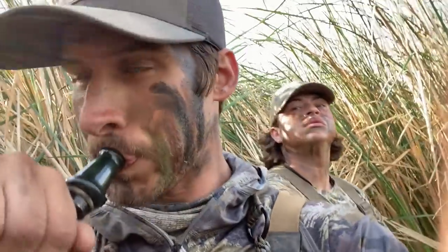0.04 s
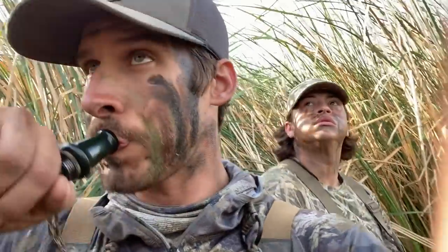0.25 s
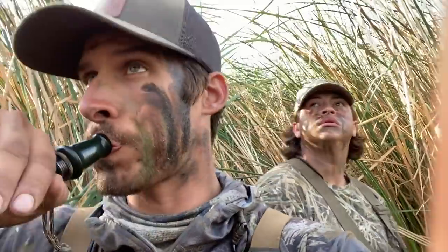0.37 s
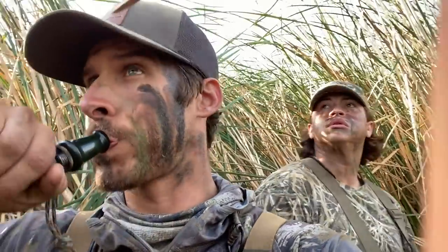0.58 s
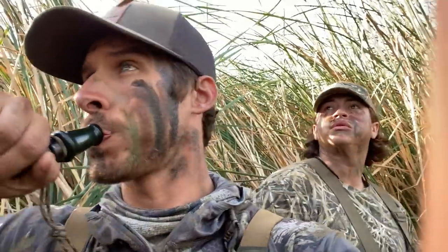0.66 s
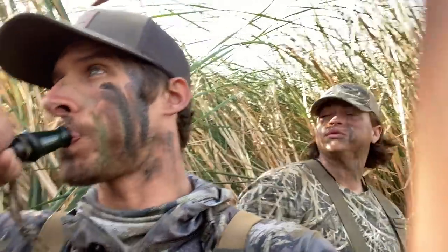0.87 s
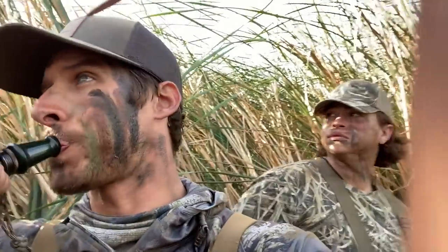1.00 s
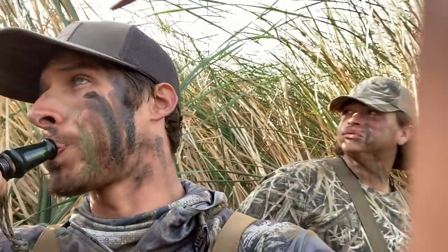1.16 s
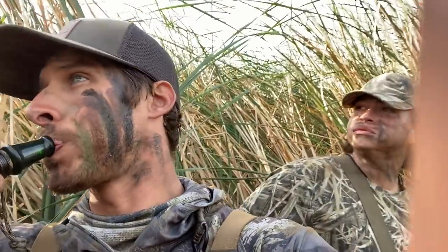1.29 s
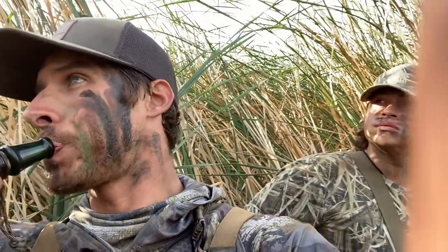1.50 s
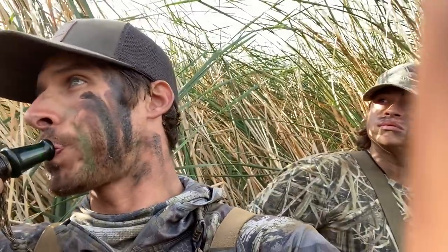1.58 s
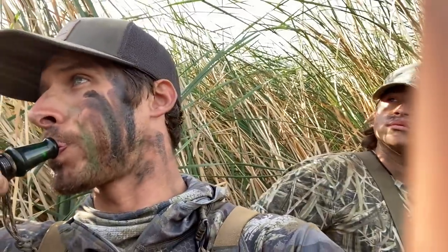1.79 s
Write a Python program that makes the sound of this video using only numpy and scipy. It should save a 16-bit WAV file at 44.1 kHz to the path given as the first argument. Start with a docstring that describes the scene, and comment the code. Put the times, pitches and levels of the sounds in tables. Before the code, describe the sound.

A handheld duck call blown close up gives three short, reedy quacks, each fainter than the last.

```python
"""A handheld duck call is blown three times, close to the microphone, each quack fainter than the last.
Its reed slaps about 360 times a second, splits into long and short cycles and rings the barrel and cupped
hand; each slap lets out a puff of hissing air, and a thin squeal falls away as the air stops.
The open marsh returns a faint echo over a low distant rumble, with soft handling knocks and, at the start,
a brief rustle of clothing."""
import sys
import numpy as np
from scipy import signal
from scipy.fft import rfft, irfft
from scipy.io import wavfile
from scipy.ndimage import uniform_filter1d, minimum_filter1d

SR = 44100
rng = np.random.default_rng(int(sys.argv[2]) if len(sys.argv) > 2 else 0)


def to_wav(sig):
    """Store sig (one row per channel, or 1-D mono) as 16-bit WAV at the path in sys.argv[1].

    Samples outside -1..1 are clipped; the rate is SR.
    """
    pcm = np.clip(np.atleast_2d(sig), -1, 1) * 32767
    pcm = np.round(pcm).astype(np.int16)
    wavfile.write(sys.argv[1], SR, pcm.T)  # frames by channels


N = 81585

# spectrum of air hissing past the reed: freq_hz, relative level_db
AIR_SPECTRUM = [(300, -28.5), (1500, -10), (2400, -4.5), (3200, -2), (3900, -8), (4800, -11.5), (5800, -2),
                (6800, -10), (7800, -9), (9700, -10.5), (10700, -19.5), (11800, -19.5), (13200, -27.5),
                (16000, -31)]
LOUD_DB = -18  # quack level under which the 2 kHz ring softens; also the reference for its air


def undb(db):
    """Decibels to gain."""
    return 10 ** (np.asarray(db) / 20)


def curve(table, at, axis=1):
    """One column of a table, joined by straight lines."""
    rows = np.array(table, float)
    return np.interp(at, rows[:, 0], rows[:, axis])


def colour(points, hz):
    """Decibels of a spectrum on a log-frequency axis."""
    rows = np.array(points, float)
    return np.interp(np.log(np.maximum(hz, 1)), np.log(rows[:, 0]), rows[:, 1])


def noise(points):
    """Noise of rms 1 with the given spectrum."""
    gains = undb(colour(points, np.fft.rfftfreq(N, 1 / SR)))
    x = irfft(rfft(rng.standard_normal(N)) * gains, N)
    return x / x.std()


def ringing(db):
    """Causal (minimum-phase) frequency response with the given gains, by folding the cepstrum."""
    cepstrum = irfft(np.log(undb(db)))
    half = len(cepstrum) // 2
    cepstrum[1:half] *= 2
    cepstrum[half + 1:] = 0
    return np.exp(rfft(cepstrum))


def add(out, start, x):
    """Mix a short sound in at a sample position."""
    out[start:start + len(x)] += x[:len(out) - start]


def background(t):
    """Low distant rumble, nearly alike on both sides, and a brief rustle of clothing, separate on each."""
    # spectrum of the distant rumble: freq_hz, relative level_db
    rumble_spectrum = [(15, -39), (25, -23), (70, 4), (168, -6), (278, -26.5), (309, -34), (584, -43),
                       (761, -29.5), (1440, -33.5), (2140, -28.5), (3100, -40), (4030, -40.5), (14000, -54)]
    # swell of the rumble: time_s, level_db before the lift below
    rumble_swell = [(0.0, -64), (0.17, -57.5), (0.304, -71.5), (0.546, -71.5), (0.752, -65.5), (0.85, -66),
                    (1.05, -71), (1.22, -75), (1.38, -72.5), (1.85, -73.5)]
    # spectrum of the clothing: freq_hz, relative level_db
    rustle_spectrum = [(200, 2.5), (600, -10), (1500, -34), (4000, -24.5), (8500, -20.5), (14000, -32)]
    rumble_lift_db, rustle_db, rustle_end_s, rustle_fade_s = 3.5, -67.5, .22, .017

    common = noise(rumble_spectrum)
    side = .25 * noise(rumble_spectrum) * np.array([[1], [-1]])  # opposite sign left and right
    rumble = (common + side) * undb(curve(rumble_swell, t) + rumble_lift_db)
    rustle = np.array([noise(rustle_spectrum), noise(rustle_spectrum)])
    rustle = rustle * np.clip((rustle_end_s - t) / rustle_fade_s, 0, 1)
    return rumble + undb(rustle_db) * rustle


def marsh(t, x):
    """Faint scatter from the reed beds as decaying noise, with a later swell from far off."""
    # spectrum the marsh sends back: freq_hz, relative level_db
    marsh_spectrum = [(200, -6.5), (800, -5), (1600, -8.5), (2300, -2.5), (3000, -2), (6000, -17),
                      (14000, -23.5)]
    echo_db, echo_t60_s = -54.52, .8
    far_db, far_delay_s, far_spread_s = -16.52, .27, .04  # far_db is relative to the start of the near scatter
    linger_db, linger_t60_s = -71.5, .9
    linger_spectrum = [(600, -19), (1600, -14), (2100, -2.5), (2450, -9), (3000, -22.5), (9000, -37)]

    near_scatter = undb(-60 * t / echo_t60_s)
    far_swell = undb(far_db) * np.exp(-((t - far_delay_s) / far_spread_s) ** 2)
    shape = near_scatter + far_swell
    shape = shape / np.sqrt(np.sum(shape ** 2))
    echo = signal.fftconvolve(x, undb(echo_db) * noise(marsh_spectrum) * shape)[:N]
    # a dying wash of noise from the first instant, as the echo of an earlier quack
    linger = undb(linger_db - 60 * t / linger_t60_s) * noise(linger_spectrum)
    return echo + linger


def ticks(t):
    """Soft knocks from handling the call: short bursts of noise round one pitch."""
    # handling knocks: start_s, centre_hz, level_db before the envelope, decay_s
    knocks = [(0.056, 7040, -54, 0.0027), (0.134, 440.5, -47.5, 0.0032), (.184, 438, -55, 0.0046),
              (0.631, 479.5, -61.5, 0.0037), (0.769, 424.2, -63, 0.0042), (1.410, 476, -60, 0.0035),
              (1.409, 1450, -67, .003)]
    out = np.zeros(N)
    for start, hz, db, decay in knocks:
        age = np.maximum(t - start, 0)
        envelope = np.minimum(age / 0.003, 1) * np.exp(-age / decay)
        out += undb(db) * envelope * noise([(hz / 4, -25), (hz, 0), (hz * 2, -9), (hz * 8, -45)])
    return out


def slap(hz, age, hand, level_db):
    """Colour in dB of one reed slap; the hand opens and the treble blooms as the quack goes on."""
    # one reed slap through the barrel: freq_hz, relative level_db
    barrel_spectrum = [(100, -50), (230, -12.5), (360, -23.5), (470, -13.5), (600, -30.5), (740, -13.5),
                       (1000, -13.5), (1270, -9.5), (1650, -10), (2150, -2.5), (2420, -4.5), (2700, -17.5),
                       (3100, -38.5), (3900, -29.5), (4900, -36.5), (5750, -22), (6700, -41), (7700, -30.5),
                       (8400, -46.5), (9700, -30.5), (10700, -45), (11800, -43.5), (13200, -61.5),
                       (16000, -66)]
    opening_s, hand_width_hz = 0.052, 59
    hollow_hz, hollow_width_hz = 673, 68
    bore_spacing_hz, bore_db = 643.7, -0.5  # ripple of the bore's upper resonances
    bloom_s, bloom_db, bloom_from_hz = .022, -13, 2700
    softening = 0.39  # dB lost around 2.2 kHz per dB below LOUD_DB

    shut_hz, open_hz, hand_db, treble_db, hollow_db = hand
    hand_hz = np.interp(age, [0, opening_s], [shut_hz, open_hz])
    db = colour(barrel_spectrum, hz)
    db = db + hand_db / (1 + ((hz - hand_hz) / hand_width_hz) ** 2)
    db = db + hollow_db * np.exp(-((hz - hollow_hz) / hollow_width_hz) ** 2)
    bore_ripple_db = bore_db * np.cos(2 * np.pi * hz / bore_spacing_hz)
    db = db + (treble_db + bore_ripple_db) * np.clip(hz / 1000 - 2.5, 0, 1)
    db = db + bloom_db * max(1 - age / bloom_s, 0) * np.clip((hz - bloom_from_hz) / 500, 0, 1)
    return db + softening * min(level_db - LOUD_DB, 0) * np.exp(-((hz - 2200) / 500) ** 2)


def quack(controls, beating, hand):
    """Each reed cycle gives a low push, an uneven slap that rings barrel and hand, and a puff of air."""
    frame = 1024  # samples in one slap
    quack_lift_db, fundamental_lift_db = 4, 4
    ring_s, choke_s = .0016, .0006  # free ring, then decay
    attack_s, attack_db = .008, -6.5  # the first slaps are weak
    # unevenness at full alternation (swing) and full roughness (jitter, scatter)
    swing_s, swing_db, swing_rad = .00009, 1.1, 0.62
    jitter_s, scatter_db = .00021, 1.5
    push_swing, push_scatter = 0.062, 0.22  # as fractions of the push
    air_db, air_decay_s, air_growth = -24, 0.0049, 0.87  # growth in dB per dB of slap level
    air_bloom_s, air_bloom_db = .022, -13  # the puffs begin weak
    # faint hiss swelling up to the start of the quack and dying away after it; level relative to air_db
    onset_hiss_db, onset_hiss_s = -36.5, .016

    begin = controls[0][0]
    t = np.arange(begin, controls[-1][0], 1 / SR)
    phase = np.cumsum(curve(controls, t)) / SR
    slaps = np.interp(np.arange(.3, phase[-1]), phase, t)  # one slap a cycle
    hz, age = np.fft.rfftfreq(frame, 1 / SR), np.arange(frame) / SR
    main = (hz > 900) & (hz < 3000)  # band whose rms sets the ring level
    low = np.clip((600 - hz) / 160, 0, 1)
    mid = np.interp(hz, [1000, 1500, 2500, 2900], [0, 1, 1, 0])
    choke = np.exp(-np.maximum(age - ring_s, 0) / choke_s)  # the reopening reed chokes the ring
    out, puffs = np.zeros(N), np.zeros(N)
    chances = rng.standard_normal((len(slaps), 2))
    for k, (at, chance) in enumerate(zip(slaps, chances)):
        pitch = curve(controls, at)
        level_db, base_db = curve(controls, at, axis=2), curve(controls, at, axis=3)
        split = curve(beating, at) * (-1) ** k  # long and short cycles take turns
        rough = curve(beating, at, axis=2)
        since = at - begin

        body = ringing(slap(hz, since, hand, level_db))
        ring = mid * rfft(irfft(body) * choke) + (1 - mid) * body
        ring = ring / np.sqrt(2 * np.sum(abs(ring[main]) ** 2) / frame * pitch / SR)
        ring_db = level_db + attack_db * max(1 - since / attack_s, 0) + quack_lift_db
        ring = ring * undb(ring_db + swing_db * split + scatter_db * rough * chance[1])
        shift_s = swing_s * split + jitter_s * rough * chance[0]
        # alternate slaps also differ in shape: a constant phase turn
        ring = ring * np.exp(-2j * np.pi * hz * shift_s - 1j * swing_rad * split)

        push = body / np.interp(pitch, hz, abs(body)) * SR / pitch / np.sqrt(2)
        push = push * undb(base_db + fundamental_lift_db)
        push = push * (1 + push_swing * split + push_scatter * rough * chance[0])

        start = int(at * SR) - frame // 4  # room for slaps that come early
        delay = np.exp(-2j * np.pi * hz * (at - start / SR))
        add(out, start, irfft((low * push + (1 - low) * ring) * delay))
        puff_db = LOUD_DB + air_growth * (level_db - LOUD_DB)
        puff_db = puff_db + air_bloom_db * max(1 - since / air_bloom_s, 0)
        add(puffs, int(at * SR), undb(puff_db) * np.exp(-age / air_decay_s))
    onset_hiss = undb(onset_hiss_db) * np.exp(-abs(np.arange(N) / SR - begin) / onset_hiss_s)
    return out + undb(air_db) * (puffs + onset_hiss) * noise(AIR_SPECTRUM)


def squeal(t, start, length, start_hz, end_hz, db):
    """As the air stops, the reed flutters in a higher, falling tone."""
    # harmonics of the squeal from the fundamental up: relative level_db
    partials_db = [-9, -4.5, 2, 2.5]
    fade_db, air_db = -9.5, -16.5
    dulling_db = -9.5  # each higher partial fades this much more

    u = np.clip((t - start) / length, 0, 1)
    flutter = 1 + .05 * noise([(200, 5), (600, -53), (2000, -88.5)])
    pitch = (start_hz + (end_hz - start_hz) * u) * flutter
    phase = 2 * np.pi * np.cumsum(pitch) / SR
    tone = np.zeros(N)
    for k, partial_db in enumerate(partials_db):
        tone += undb(partial_db + dulling_db * k * u) * np.sin((k + 1) * phase)
    envelope = undb(db + fade_db * u) * np.minimum(u * 10, 1) * np.minimum((1 - u) * 2, 1)
    return envelope * (tone + undb(air_db) * noise(AIR_SPECTRUM))


def ports(x):
    """The near sound mostly reaches the left microphone port first; the housing colours each side."""
    # lead of the left port: freq_hz, phase_rad
    port_lead = [(0, -1), (520, 1.18), (780, 0.6), (2760, 2.5), (3190, 3), (4220, 6.5), (5000, 8.5),
                 (5600, 8), (6720, 7.5), (8180, 5.5), (9990, 10), (11200, 9.5), (12400, 17.5), (14400, 13)]
    # left minus right: freq_hz, difference_db
    port_balance = [(60, -3.5), (110, 0.5), (200, 4.5), (370, 1), (680, 9), (1250, 2.5), (2300, 0),
                    (4220, -5), (7750, 3), (14200, -2.5)]
    hz = np.fft.rfftfreq(N, 1 / SR)
    tilt = undb(colour(port_balance, hz) / 2)
    right = np.exp(-1j * curve(port_lead, hz)) / tilt
    return irfft(rfft(x) * np.array([tilt, right]), N)


def scene():
    """Three quacks close to the microphone, the marsh around them."""
    # the reed, one table per quack: time_s, pitch_hz, slap level_db and fundamental level_db before the lifts
    reed_controls = [
        [(0.226, 235.8, -32, -46), (0.232, 281.2, -28.5, -38.5), (0.24, 340.4, -26, -41),
         (0.244, 371.4, -9.5, -34.5), (0.254, 354.9, -8, -28.5), (0.292, 368.3, -15.5, -42),
         (0.358, 370.2, -20, -47.5), (0.37, 394.5, -29.5, -45), (0.386, 412.7, -52.5, -64)],
        [(0.829, 255.2, -40.5, -46), (0.839, 266, -37.5, -48), (0.847, 336.7, -31, -45),
         (0.853, 353.4, -22.5, -40), (0.877, 347.8, -16, -37), (0.911, 357.2, -21.5, -41.5),
         (0.979, 384, -24.5, -43.5), (1.002, 452, -48.5, -51)],
        [(1.453, 252, -46.5, -51.5), (1.459, 271, -50.5, -53), (1.471, 341, -33, -49.5),
         (1.489, 356.5, -26, -42), (1.521, 361.4, -20, -40.5), (1.589, 374.9, -28.5, -47.5),
         (1.611, 419, -34.5, -44.5), (1.619, 445, -48.5, -59.5)],
    ]
    # how the reed beats, one table per quack: time_s, long-short alternation 0-1, roughness 0-1
    reed_beating = [
        [(.23, 0.2, 0), (.25, 0.51, 0.2), (.275, 0.54, 0.4), (.3, 0.7, 0.9), (.345, .45, 0.5), (.375, 0.4, 0.3)],
        [(.83, 0.05, .15), (.85, 0, .2), (.868, 0.9, 0.2), (.895, 1, 0.7), (.91, 1, 0.2), (.975, 0.88, .13),
         (1.0, 0, 0.3)],
        [(1.455, 0.17, 0.15), (1.497, .1, .12), (1.515, 0.6, .7), (1.545, 0.73, 0.8), (1.562, 1, 0.2),
         (1.595, 0.78, .18), (1.615, 0, 0.41)],
    ]
    # cupped hand, one row per quack: resonance shut_hz, open_hz, resonance_db, treble_db, hollow_db
    cupped_hand = [(1830, 2197, 26, -4, -3), (1878, 2140, 18.5, 1.5, -10.5), (2040, 2080, 19, 2, -19.5)]
    # closing squeals: start_s, length_s, start_hz, end_hz, level_db before the fade and partial levels
    closing_squeals = [(0.374, 0.031, 635, 500, -45), (0.996, 0.037, 654.7, 454, -38.5),
                       (1.616, 0.034, 656, 460, -40)]
    # how strongly each quack carries into the reeds: relative level_db
    carry_db = [-3, 0, 3.5]

    t = np.arange(N) / SR
    quacks = [quack(*parts) for parts in zip(reed_controls, reed_beating, cupped_hand)]
    squeals = sum(squeal(t, *row) for row in closing_squeals)
    near = sum(quacks) + squeals + ticks(t)
    far = sum(undb(db) * x for db, x in zip(carry_db, quacks))
    echoes = np.array([marsh(t, far), marsh(t, far)])  # separate scatter left and right
    return ports(near) + echoes + background(t)


def record(dry):
    """A limiter rounds the highest peaks and the recorder cuts the top."""
    ceiling, top_hz = .92, 14800
    peak = abs(dry).max(axis=0)
    needed = minimum_filter1d(ceiling / np.maximum(peak, ceiling), size=301)
    gain = uniform_filter1d(needed, size=301)
    top_cut = signal.ellip(8, .2, 70, top_hz, fs=SR, output="sos")
    return signal.sosfilt(top_cut, dry * gain)


dry = scene()
out = record(dry)
to_wav(out)
```